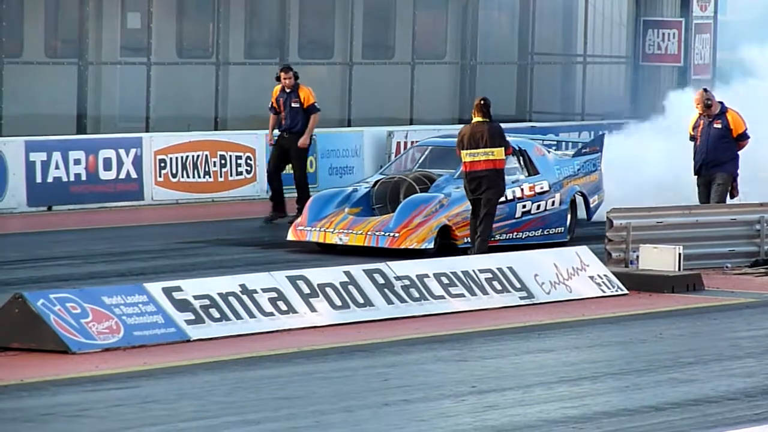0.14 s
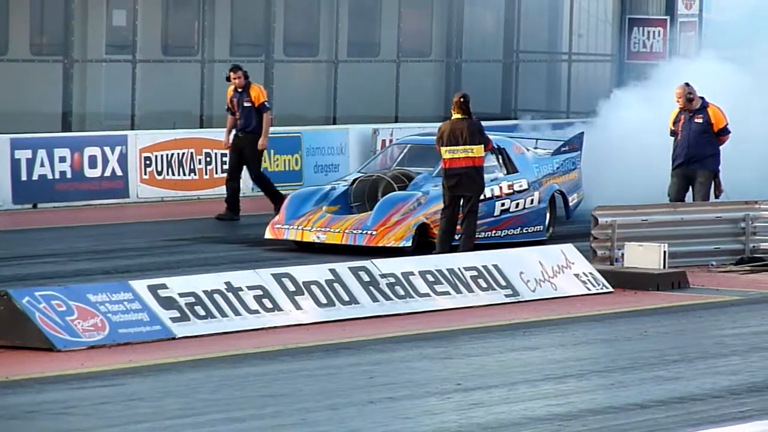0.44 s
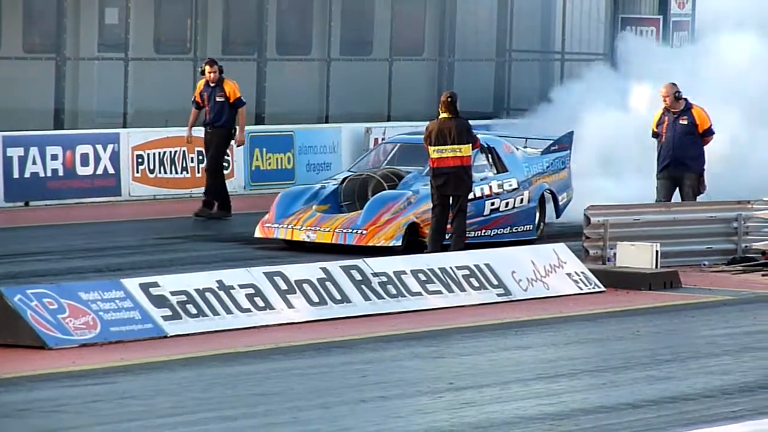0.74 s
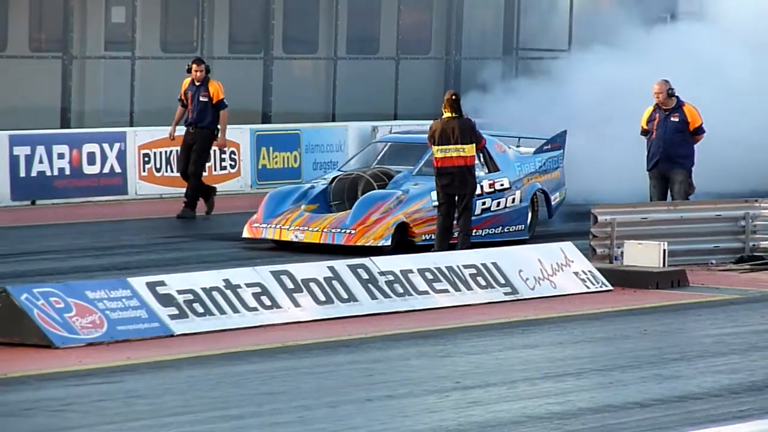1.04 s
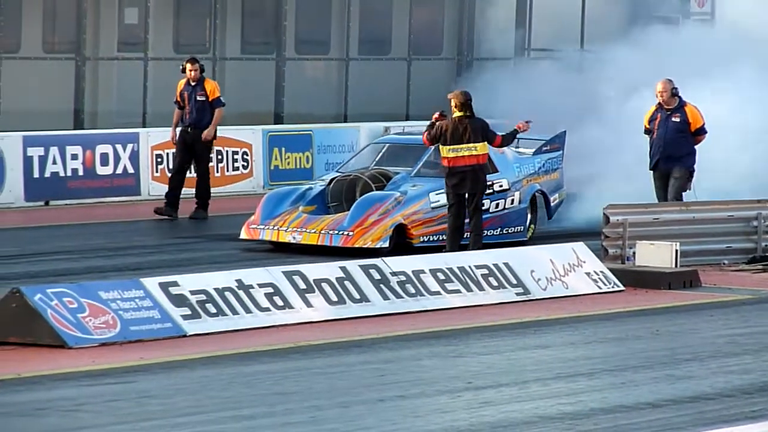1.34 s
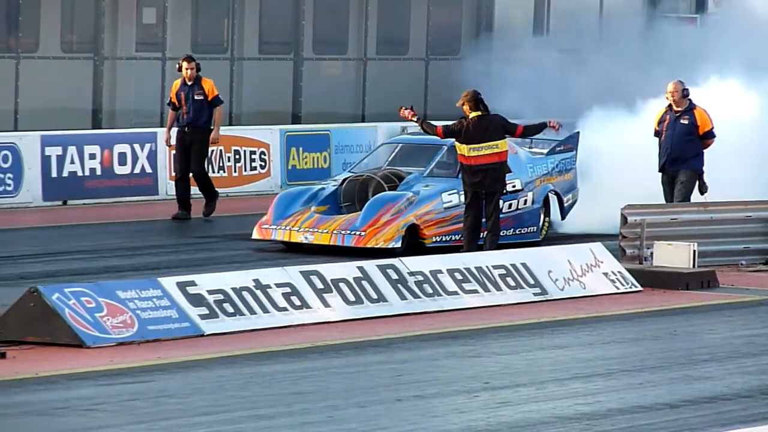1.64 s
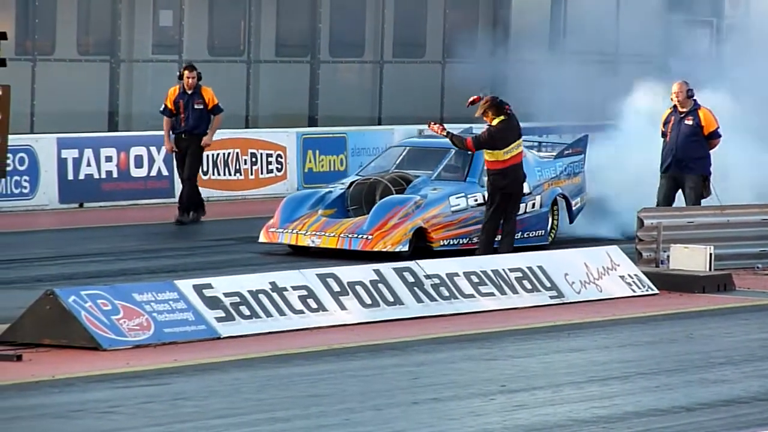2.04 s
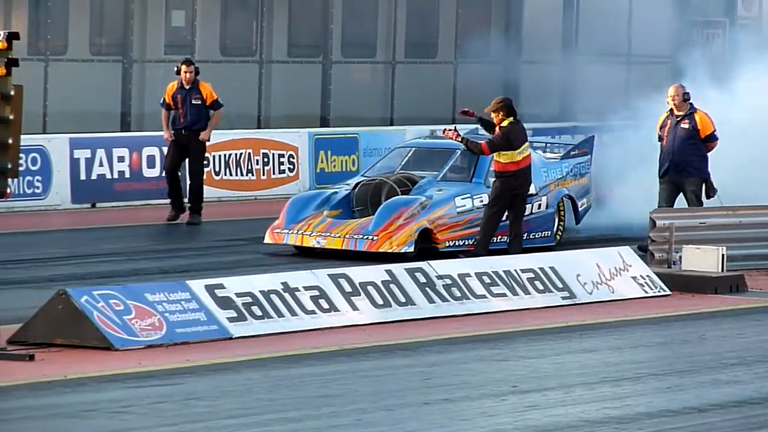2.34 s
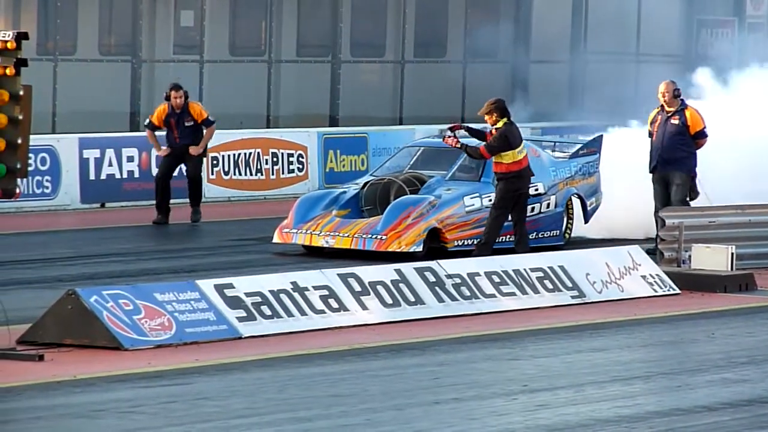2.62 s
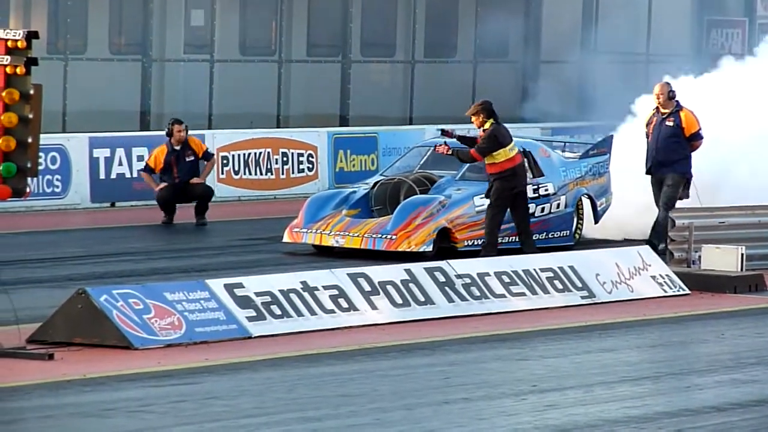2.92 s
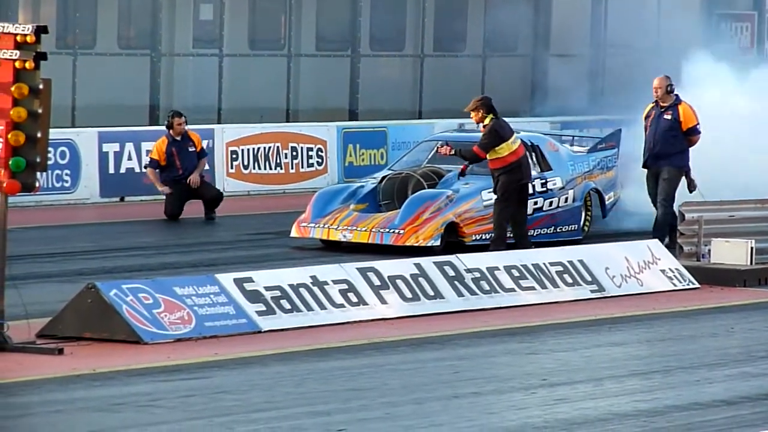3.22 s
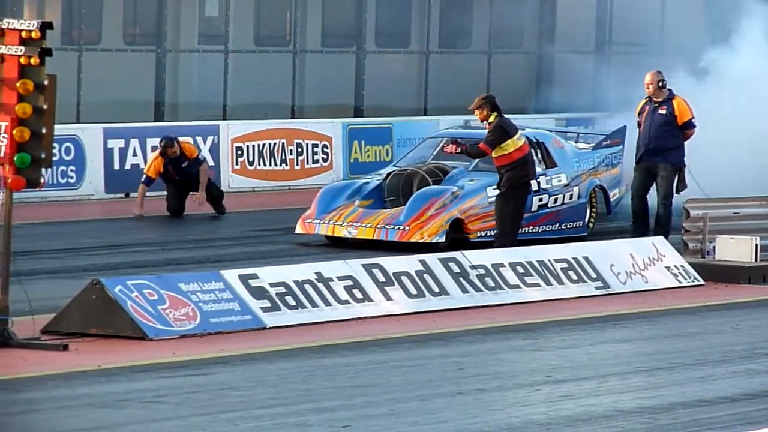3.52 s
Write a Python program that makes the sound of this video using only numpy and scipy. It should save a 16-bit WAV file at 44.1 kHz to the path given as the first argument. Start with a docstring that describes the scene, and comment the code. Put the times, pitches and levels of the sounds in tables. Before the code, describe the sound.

A jet engine runs in place on a drag strip, its high whine wavering over a constant roar. Four afterburner blasts break in, each crackling and thumping before rolling away, with slight echo from the trackside walls.

```python
"""A high whine over a steady roar, then a blast: a standing jet dragster fires its afterburner four times.
Each burst is a crackling blast on a deep bang, a low thump a moment later and a roar that rolls on.
The spinning compressor blades make the whine, among buzzing shaft tones and the hiss of the intake.
The exhaust roars underneath, and the trackside walls echo both the exhaust and the bursts."""
import sys
import numpy as np
from scipy import signal
from scipy.fft import rfft, irfft, next_fast_len
from scipy.io import wavfile
from scipy.ndimage import uniform_filter1d

SR = 44100
rng = np.random.default_rng(int(sys.argv[2]) if len(sys.argv) > 2 else 0)


def generate_wav(signal):
    """Clip the signal to [-1, 1] and save it as 16-bit WAV at the path in sys.argv[1]."""
    frames = np.transpose(np.atleast_2d(signal))
    scaled = np.clip(frames, -1, 1) * 32767
    pcm = np.round(scaled).astype(np.int16)
    wavfile.write(sys.argv[1], SR, pcm)


N = 161847

# One row per burst: start_s, blast_db, blast_hold_s, blast_decay_s, bang_db, thump_delay_s,
# thump_db, dip_db, roar_db, roar_swell_s, roar_hold_s, ring_db
BURSTS = [(0.179, -16.8, 0.083, .06, -37, .09, -30, -1, -19.5, 0.17, .21, -29),
          (0.796, -14, .036, .07, -35, .098, -30.5, -3, -18, .19, .39, -25),
          (1.913, -17.3, .086, .07, -36, .1, -32, 0, -17.7, .15, 0.23, -22),
          (3.161, -15, .024, .035, -23, .105, -28, -7, -27.5, 0.077, .3, -34)]
# How much bass and treble each part of a burst has: pitch_hz, level_db
BLAST_SPECTRUM = [(25, -57), (60, -27), (130, -17), (280, -6), (520, 1.5), (700, 2.5), (900, -2.5),
                  (1250, -3), (1800, -10), (3000, -11.5), (6000, -28), (14000, -46)]
BANG_SPECTRUM = [(25, -55), (90, -20), (200, -3), (300, 1), (600, -0.5), (1000, -13), (3000, -41)]
THUMP_SPECTRUM = [(25, -36), (62, -19), (100, 3.5), (140, 1), (280, -4), (700, -22), (3000, -48)]
ROAR_SPECTRUM = [(25, -38), (60, -38), (120, -17.5), (240, -5.5), (380, -5.5), (540, 2), (700, 0.5),
                 (830, -5.5), (1100, -7), (1700, -15.5), (2600, -16), (5000, -28.5), (10000, -57)]

def afterburner():
    """The flame lights: blast, bang, late thump, ringing roar. Also gives a brief dip after each thump."""
    blast = bang = thump = roar = ring = total_dip_db = 0
    for (start_s, blast_db, blast_hold_s, blast_decay_s, bang_db, thump_delay_s,
         thump_db, dip_db, roar_db, roar_swell_s, roar_hold_s, ring_db) in BURSTS:
        thump_s = start_s + thump_delay_s
        blast += undb(blast_db) * envelope(start_s, .012, blast_hold_s, blast_decay_s)
        crack = envelope(thump_s + .017, rise_s=.002, hold_s=.008, decay_s=.008)
        blast += undb(thump_db + 6) * crack
        bang += undb(bang_db) * envelope(start_s, rise_s=.008, hold_s=.025, decay_s=.078)
        thump += undb(thump_db) * envelope(thump_s, rise_s=.0032, hold_s=.024, decay_s=.045)
        total_dip_db += dip_db * envelope(thump_s + .035, rise_s=.012, hold_s=.045, decay_s=.045)
        flame = envelope(start_s, roar_swell_s, roar_hold_s, decay_s=.13)
        roar += undb(roar_db) * flame
        ring += undb(ring_db) * flame ** 2 * flame_ring(start_s)
    dip = undb(total_dip_db)
    # Fill the loudness outlines with noise.
    sound = bang * jet_noise(rng.standard_normal(N), BANG_SPECTRUM)
    sound += thump * jet_noise(rng.standard_normal(N), THUMP_SPECTRUM)
    sound += dip * blast * crackle(BLAST_SPECTRUM)
    sound += roar * undb(.72 * wander(54.8)) * crackle(ROAR_SPECTRUM)
    return sound + ring, dip


def crackle(spectrum, shocks_per_s=700, shock_share=.56):
    """Shock waves arrive as sharp clicks at random times, within the noise of swirling gas."""
    clicks = (rng.random(N) < shocks_per_s / SR).astype(float)
    shocks = np.sqrt(shock_share) * unit(clicks - clicks.mean())
    swirl = np.sqrt(1 - shock_share) * rng.standard_normal(N)
    return jet_noise(shocks + swirl, spectrum)


def flame_ring(start_s, first_hz=760, last_hz=530.4, fall_s=.15, width_hz=130):
    """Swirling gas makes the flame ring at a blurry pitch that sinks after it lights."""
    age_s = np.maximum(np.arange(N) / SR - start_s, 0)
    pitch_hz = last_hz + (first_hz - last_hz) * np.exp(-age_s / fall_s)
    swirl = wander(2 * width_hz) + 1j * wander(2 * width_hz)
    return unit(np.real(swirl * np.exp(2j * np.pi * np.cumsum(pitch_hz) / SR)))


# How many blades pass each second: time_s, pitch_hz
BLADE_PITCH = [(0, 5597), (.15, 5577), (.27, 5505), (.45, 5560), (.62, 5590), (.81, 5577), (.87, 5440),
               (1.05, 5400), (1.36, 5595), (1.54, 5590), (1.75, 5555), (1.92, 5567), (2.08, 5444),
               (2.3, 5582), (2.55, 5576), (2.76, 5550), (3.1, 5565), (3.67, 5587)]
# How the whine, the hiss (with the buzz) and the top treble swell and fade: time_s, level_db
WHINE_LEVEL = [(0, -35), (.12, -35), (.26, -27.5), (.33, -36), (.41, -28), (.48, -39), (.68, -23.5),
               (.8, -25), (.86, -37), (1.0, -37), (1.13, -30), (1.3, -33), (1.4, -27), (1.49, -37),
               (1.62, -22.5), (1.79, -35), (1.9, -27), (2.09, -35), (2.53, -21.5), (2.81, -35),
               (2.98, -21.5), (3.16, -20), (3.23, -42), (3.27, -24.5), (3.31, -39), (3.46, -36),
               (3.67, -21)]
HISS_LEVEL = [(0.0, -28), (0.24, -28), (0.33, -35), (0.49, -31), (0.81, -28.5), (0.95, -39.5),
              (0.98, -34.5), (1.26, -34.5), (1.93, -28), (2.1, -35), (2.6, -29), (2.85, -30.5), (3.17, -30),
              (3.21, -37), (3.29, -36.5), (3.32, -40.5), (3.42, -34.5), (3.67, -32)]
TREBLE_LEVEL = [(0.0, -34.5), (0.12, -31), (0.28, -36), (0.32, -42), (0.4, -36), (0.66, -32.5), (.8, -35.5),
                (.84, -41), (0.95, -45.5), (1.34, -44.5), (1.55, -36), (1.8, -36), (1.92, -33), (1.96, -38),
                (2.09, -42), (2.5, -33), (2.82, -33), (3.16, -37.5), (3.2, -40.5), (3.32, -47), (3.41, -40),
                (3.67, -40)]
# The buzz of unequal blades, tone against tone: cycles_per_turn, first_db, last_db
SHAFT_TONES = [(7, -54, -49), (8, -47, -45.5), (10, -45, -38), (11, -49, -45), (12, -42, -41.5),
               (14, -39, -42.5), (15, -45, -46), (17, -33.5, -41), (18, -40, -38.5), (19, -37.5, -37),
               (29, -41, -38), (31, -47, -46), (39, -56, -55), (41, -50, -47), (43, -45.5, -45)]
# The intake's hiss and its highest part: pitch_hz, level_db
HISS_SPECTRUM = [(1200, -35.5), (2400, -7.5), (3400, -4), (4400, 1), (5100, 2.5), (5500, 8), (6000, -0.5),
                 (6900, -4), (7500, -7.5), (7950, -13), (8600, -51)]
TREBLE_SPECTRUM = [(7000, -41), (7950, -2), (8300, -2), (9600, 0), (10400, 0), (11200, 2.5), (11900, -5),
                   (13500, -9), (15200, -18.5)]

def compressor(blades=24, full_speed_hz=5546, fade_db_per_hz=.2):
    """Passing blades whine, their small differences buzz, and the air drawn in hisses."""
    pitch_hz = curve(BLADE_PITCH)
    phase = 2 * np.pi * np.cumsum(pitch_hz * (1 + .00041 * wander(25.14))) / SR
    whine, hiss, treble = (undb(curve(rows)) for rows in (WHINE_LEVEL, HISS_LEVEL, TREBLE_LEVEL))
    # A clear tone and a rough one, then the same pair an octave higher.
    sound = whine * undb(-2.5) * wavering_tone(phase, flutter=.4, flutter_hz=45, side_db=-11)
    sound += whine * undb(-10.5) * wavering_tone(phase, flutter=1.9, flutter_hz=420, side_db=4.5)
    sound += treble * undb(-13.5) * wavering_tone(2 * phase, flutter=.62, flutter_hz=22, side_db=-10)
    sound += treble * undb(-12) * wavering_tone(2 * phase, flutter=2.5, flutter_hz=220, side_db=-2)
    # The buzz fades when the blades drop below full speed.
    buzz = hiss * undb(26 - fade_db_per_hz * np.maximum(full_speed_hz - pitch_hz, 0))
    for cycles_per_turn, first_db, last_db in SHAFT_TONES:
        tone = wavering_tone(phase * cycles_per_turn / blades, flutter=.75, flutter_hz=14, side_db=-46)
        sound += buzz * undb(np.linspace(first_db, last_db, N)) * tone
    sound += hiss * undb(2.5 + .5 * wander(40.17)) * rushing_air(HISS_SPECTRUM, side_db=-8)
    high_hiss = treble * undb(.5 + .5 * wander(40.1)) * rushing_air(TREBLE_SPECTRUM, side_db=-7.5)
    return sound + high_hiss * undb([[.4], [-.4]])  # a little to the left


def wavering_tone(phase, flutter, flutter_hz, side_db):
    """Hot, moving air makes a tone waver, a little differently on the left and right."""
    def scatter():
        return (wander(flutter_hz) + 1j * wander(flutter_hz)) / np.sqrt(2)
    waver = stereo(1 + flutter * scatter(), scatter(), side_db)
    return unit(np.real(waver * np.exp(1j * phase)))


def rushing_air(spectrum, side_db):
    """Swirling air makes a wide, even noise."""
    return colour(stereo(*rng.standard_normal((2, N)), side_db), spectrum)


# How the exhaust swells and fades: time_s, level_db
EXHAUST_LEVEL = [(0, -29), (.7, -30), (1.3, -29.5), (2.6, -30.5), (3.1, -28), (3.67, -29.5)]
# Its bass and treble: pitch_hz, level_db
EXHAUST_SPECTRUM = [(25, -31), (60, -39), (95, -17.5), (125, -13.5), (240, -5.5), (400, -4.5), (620, 1.5),
                    (850, -3.5), (1150, -3.5), (1600, -10.5), (2400, -11.5), (3500, -13), (7000, -54.5)]

def exhaust(surge_db=.5):
    """The jet of gas roars steadily, surging slightly."""
    level_db = curve(EXHAUST_LEVEL) + surge_db * wander(29.77)
    return undb(level_db) * jet_noise(rng.standard_normal(N), EXHAUST_SPECTRUM)


# At which pitches the jet's noise differs most between left and right: pitch_hz, width_db
JET_WIDTH = [(25, 4), (120, -12), (350, -40), (1000, -12), (2000, 10), (6000, 4)]

def jet_noise(source, spectrum):
    """Noise from the tailpipe: nearly the same on both sides, less so in the treble."""
    pitch_hz, level_db = np.array(spectrum).T
    known_hz, known_db = np.array(JET_WIDTH).T
    width_db = np.interp(np.log(pitch_hz), np.log(known_hz), known_db)
    power = undb(level_db) ** 2 * np.gradient(pitch_hz)
    side_gain = np.sqrt(np.sum(power * undb(width_db) ** 2) / np.sum(power))
    side = side_gain * colour(rng.standard_normal(N), np.c_[pitch_hz, level_db + width_db])
    return stereo(colour(source, spectrum), side, side_db=-24.5)


# One row per echo: delay_s, level_db
WALL_ECHOES = [(.0052, -32), (0.0123, -20.5), (.031, -18.5)]

def wall_echoes(sound):
    """The trackside walls send back later, quieter copies."""
    return sum(undb(level_db) * np.pad(sound, ((0, 0), (int(delay_s * SR), 0)))[:, :N]
               for delay_s, level_db in WALL_ECHOES)


def undb(db):
    """Turn decibels into a number to multiply by."""
    return 10 ** (np.asarray(db) / 20)


def unit(sound):
    """Scale to an average power of 1."""
    return sound / np.sqrt(np.mean(sound ** 2))


def curve(rows):
    """Join (time_s, value) rows with straight lines."""
    return np.interp(np.arange(N) / SR, *np.array(rows).T)


def envelope(start_s, rise_s, hold_s, decay_s):
    """A loudness outline: rise, hold until hold_s after the start, then die away."""
    age_s = np.arange(N) / SR - start_s
    return np.clip(age_s / rise_s, 0, 1) * np.exp(-np.maximum(age_s - hold_s, 0) / decay_s)


def wander(rate_hz):
    """A smooth random drift, roughly between -1 and 1."""
    step = max(int(SR / rate_hz), 2)
    stairs = np.repeat(rng.standard_normal(N // step + 1), step)
    return 1.3 * uniform_filter1d(uniform_filter1d(stairs, step), step)[:N]


def stereo(middle, side, side_db):
    """Add the side part on the left and subtract it on the right."""
    return middle + undb(side_db) * side * np.array([[1], [-1]])


def colour(sound, spectrum):
    """Shape bass and treble to follow a spectrum, then scale to a power of 1."""
    size = next_fast_len(N + 4096) * 2
    pitch_hz, level_db = np.array(spectrum).T
    grid_hz = np.maximum(np.arange(size // 2 + 1) * SR / size, 1)
    gain = undb(np.interp(np.log(grid_hz), np.log(pitch_hz), level_db))
    # Fold the filter so that it rings only after a click, never before.
    cepstrum = irfft(np.log(gain))
    cepstrum[1:size // 2] *= 2
    cepstrum[size // 2 + 1:] = 0
    return unit(irfft(rfft(sound, size) * np.exp(rfft(cepstrum)))[..., :N])


def scene():
    """Bursts and exhaust with their echoes, and the compressor in front."""
    bursts, dip = afterburner()
    jet = bursts + dip * exhaust()
    return undb(-1.54) * (jet + wall_echoes(jet)) + compressor()


def record(dry):
    """The recorder rounds off peaks; its microphone loses one thin band, the deepest bass and the top."""
    notched = signal.lfilter(*signal.iirnotch(7840, Q=26, fs=SR), np.tanh(dry))
    bass_cut = signal.butter(2, 42, "high", fs=SR, output="sos")
    top_cut = signal.ellip(10, .2, 80, 15400, fs=SR, output="sos")
    return signal.sosfilt(top_cut, signal.sosfilt(bass_cut, notched))


dry = scene()
out = record(dry)
generate_wav(out)
```